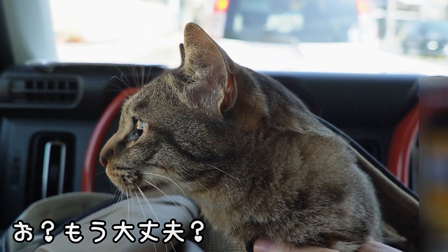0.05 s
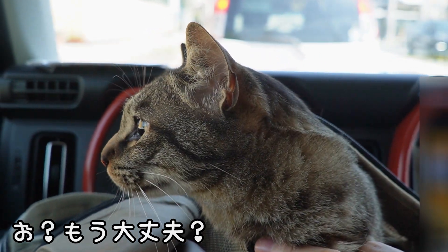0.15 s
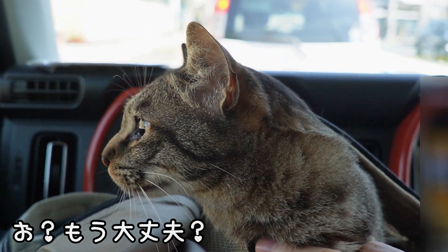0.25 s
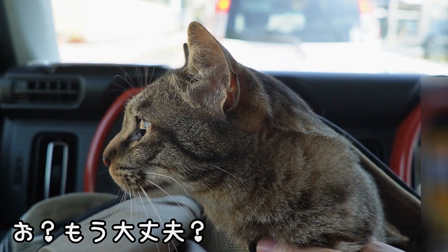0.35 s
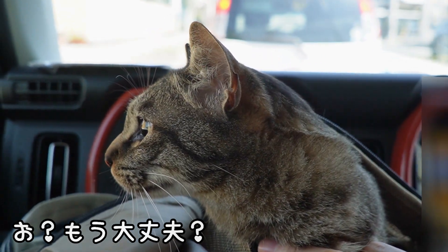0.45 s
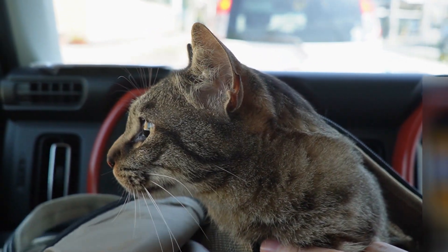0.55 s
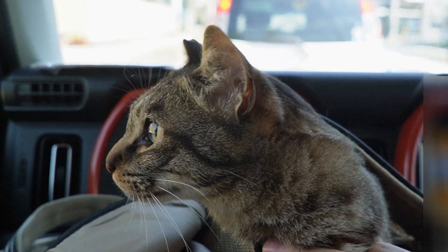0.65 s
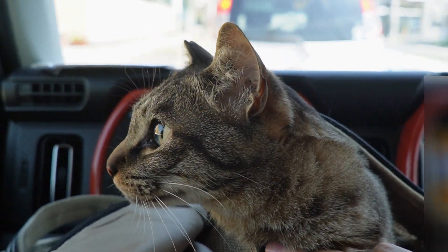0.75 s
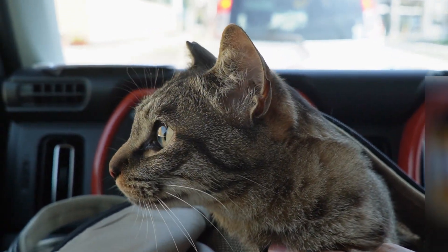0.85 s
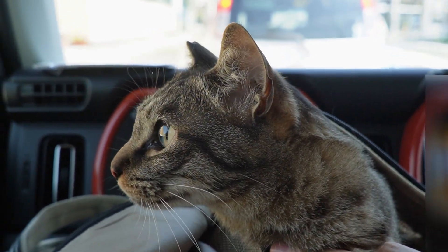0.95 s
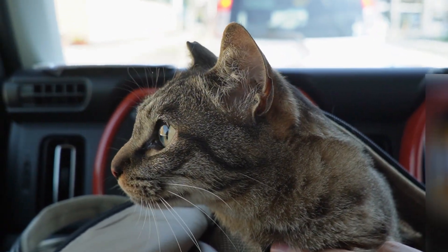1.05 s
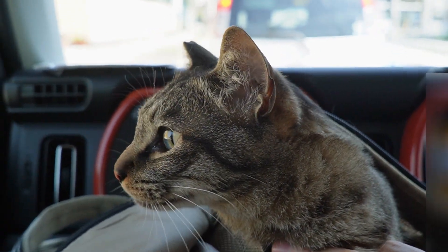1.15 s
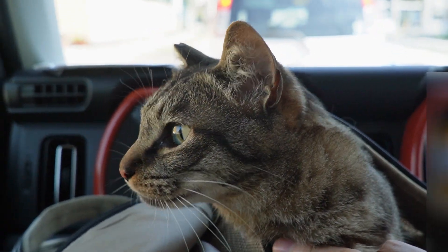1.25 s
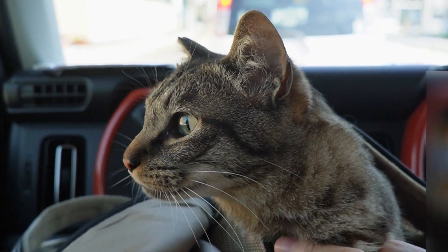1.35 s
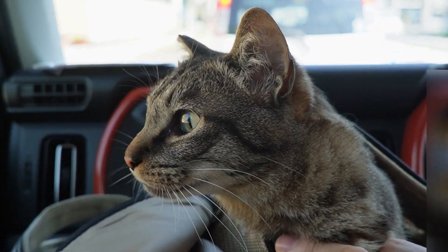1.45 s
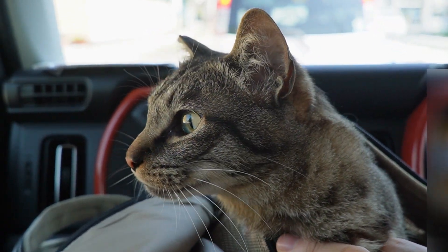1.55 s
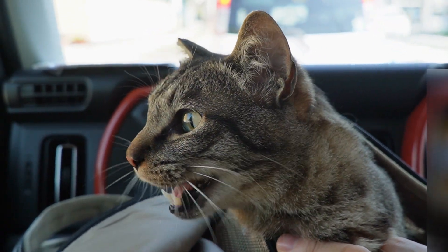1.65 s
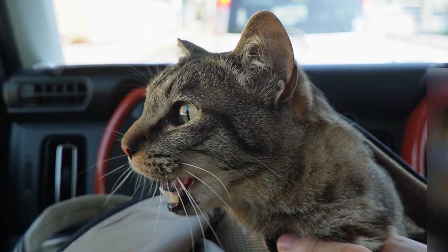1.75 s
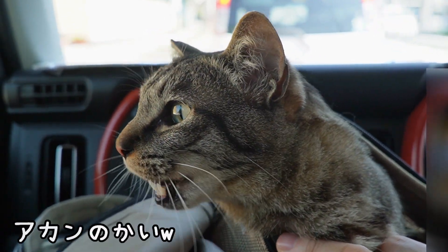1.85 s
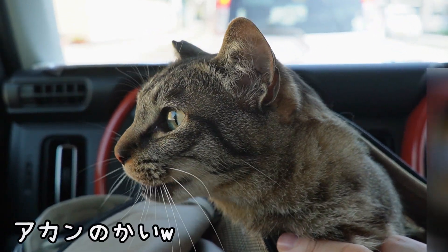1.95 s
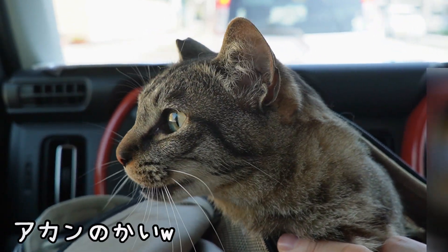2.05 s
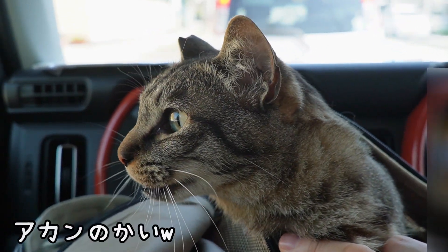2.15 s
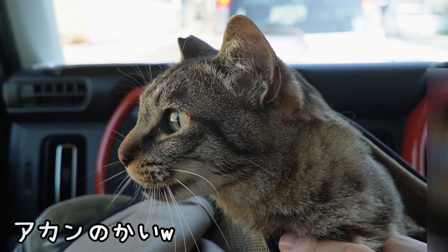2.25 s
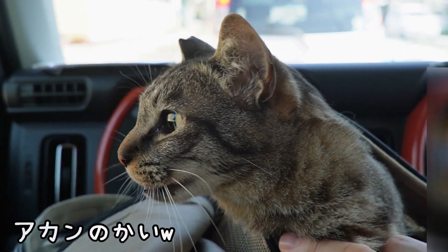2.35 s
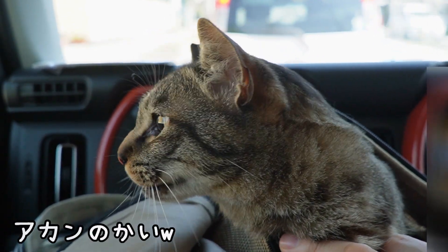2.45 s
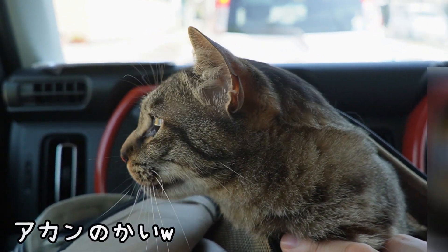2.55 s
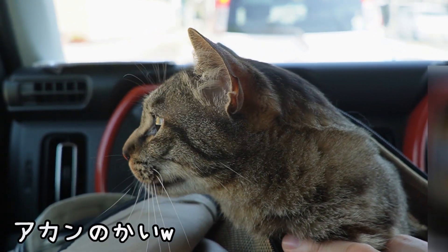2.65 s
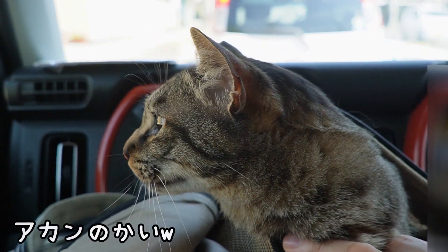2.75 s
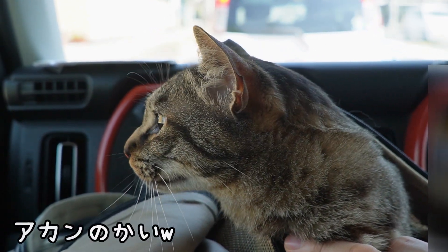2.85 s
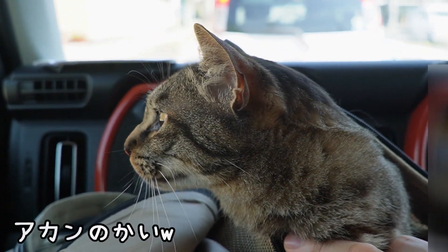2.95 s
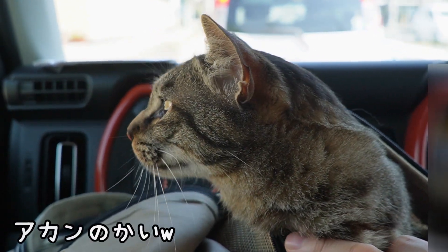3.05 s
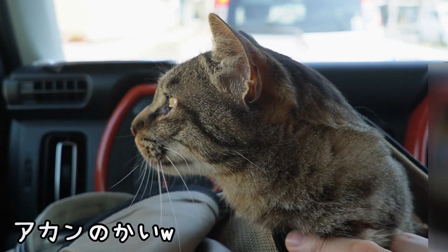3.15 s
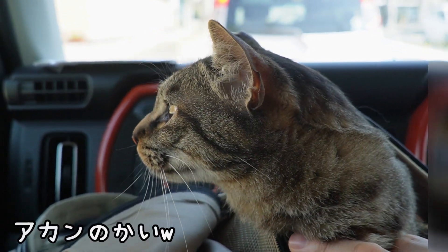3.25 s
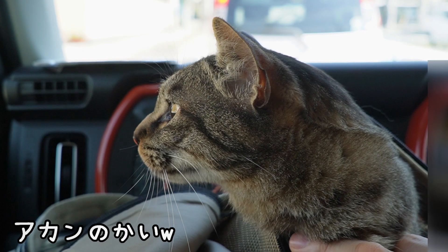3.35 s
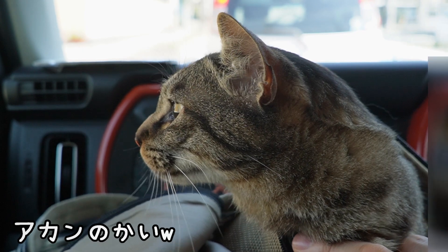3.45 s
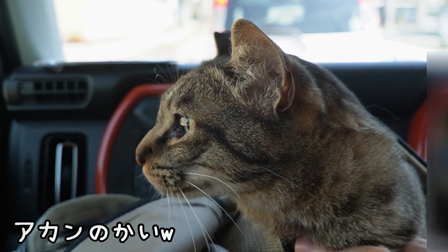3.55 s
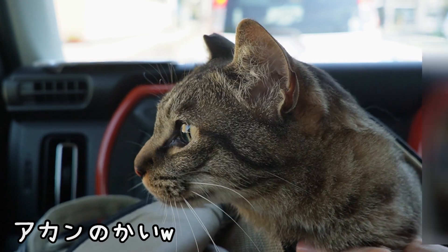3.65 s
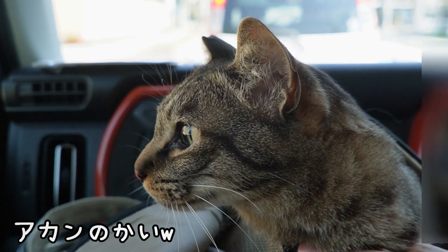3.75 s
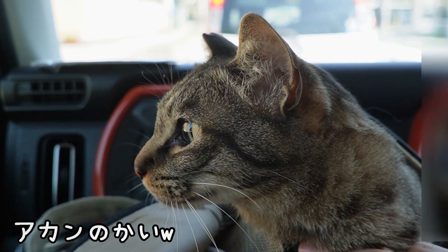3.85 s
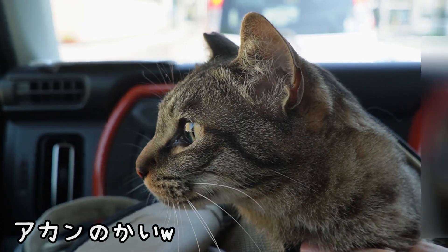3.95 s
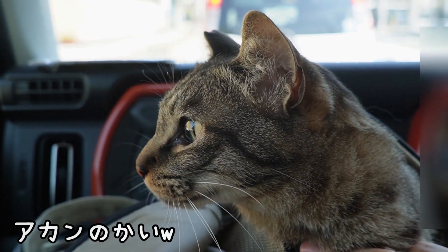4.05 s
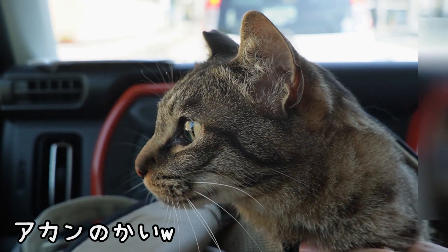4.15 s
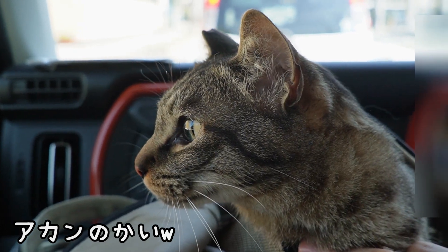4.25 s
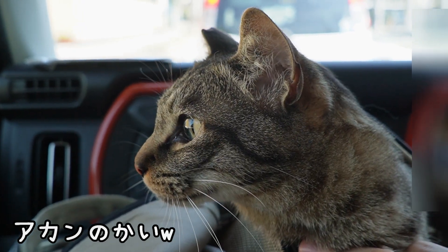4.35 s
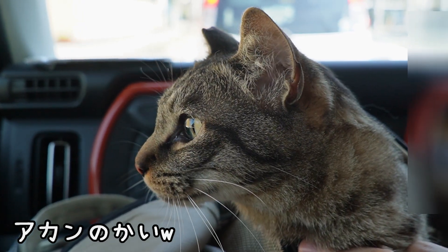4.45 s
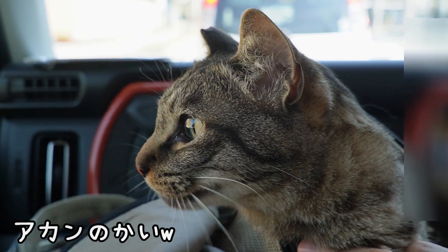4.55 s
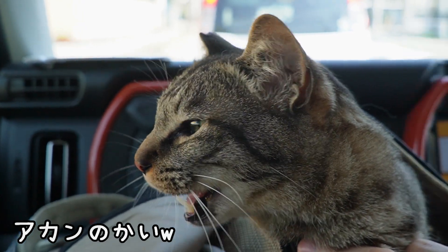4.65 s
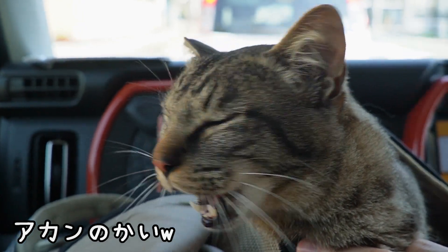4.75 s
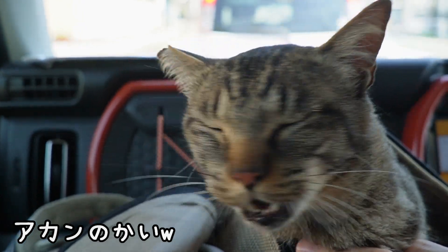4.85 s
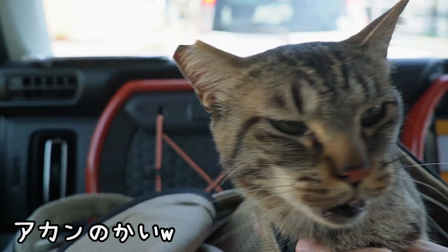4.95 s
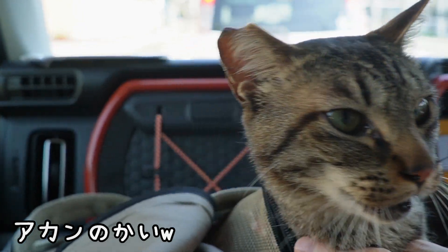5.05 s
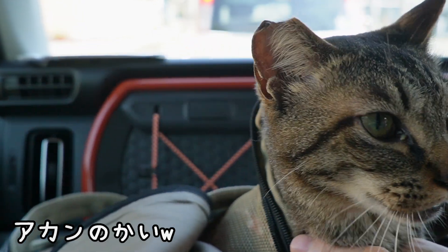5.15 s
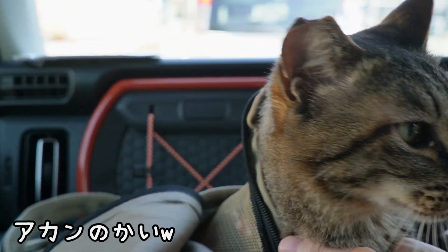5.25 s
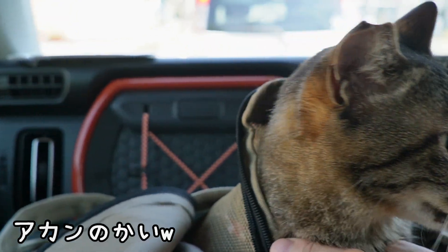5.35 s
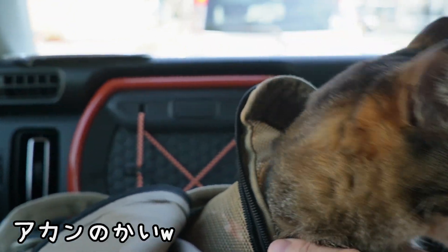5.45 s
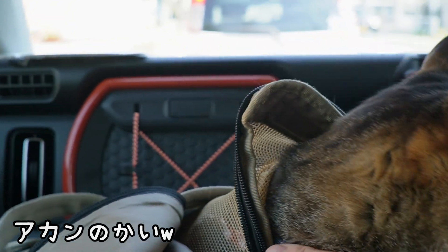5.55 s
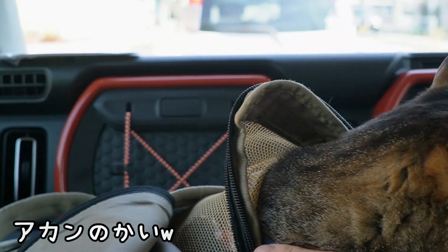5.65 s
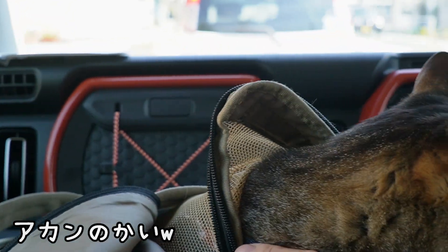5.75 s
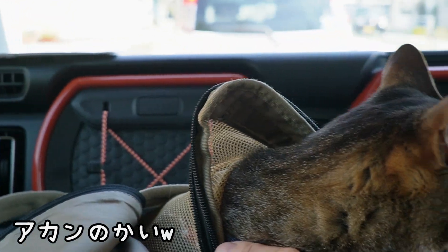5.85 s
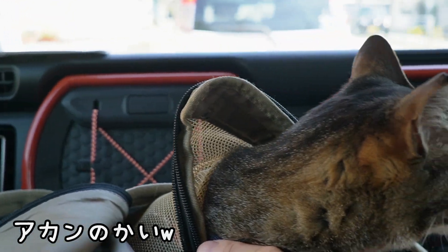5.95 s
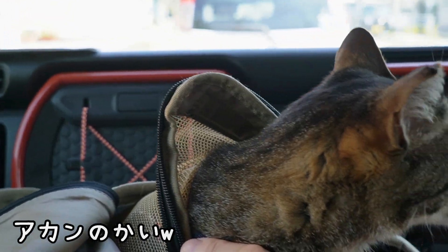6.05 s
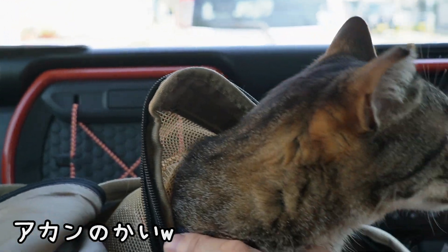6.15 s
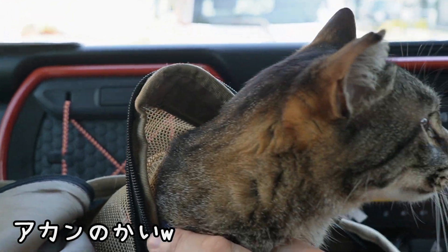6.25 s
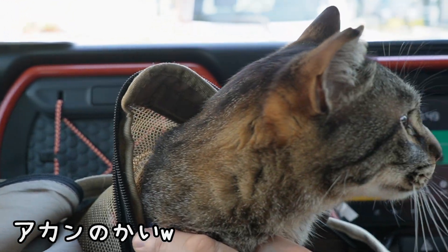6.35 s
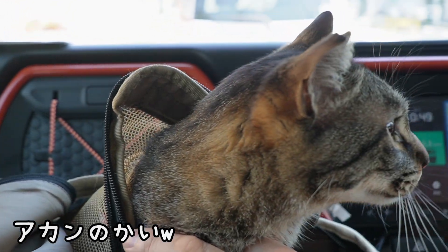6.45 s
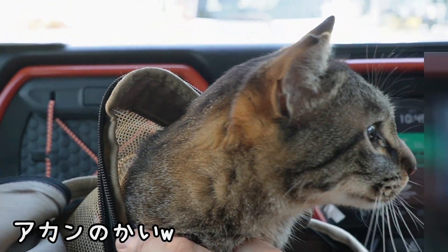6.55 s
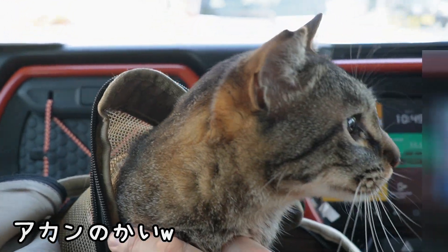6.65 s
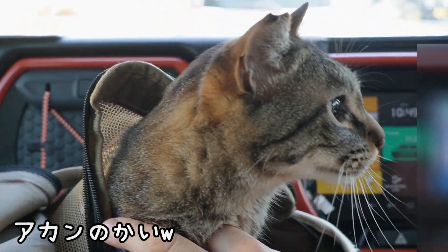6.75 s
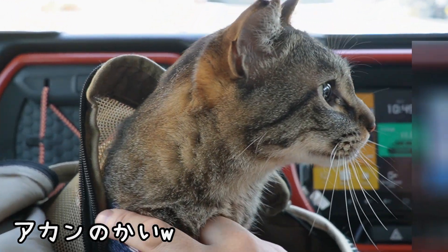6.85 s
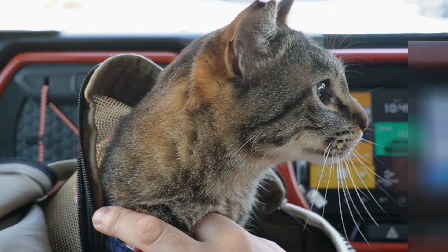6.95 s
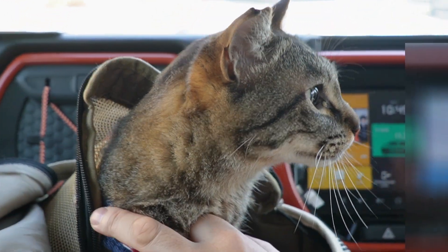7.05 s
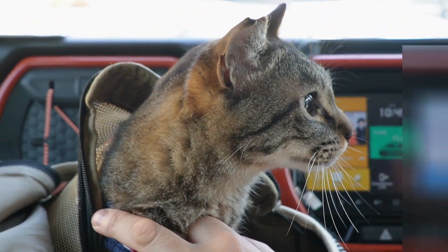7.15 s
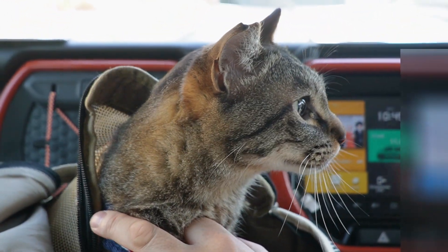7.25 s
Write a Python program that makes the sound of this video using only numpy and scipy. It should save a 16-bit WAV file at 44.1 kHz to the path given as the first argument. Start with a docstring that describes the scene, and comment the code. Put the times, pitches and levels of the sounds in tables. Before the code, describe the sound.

A cat meows loudly twice inside an idling car, then its carrier rustles and clicks over a low engine hum.

```python
"""A cat meows twice from an open carrier inside a car that idles in traffic.
Each meow is a stack of partials shaped by a mouth that opens wide and slowly closes; the voice
rasps, clears, then crumbles. The engine sets the cabin humming over steady rumble and fan noise,
and road wash and faint whines come through the glass. As the cat turns, the carrier's cloth
rustles, the bag creaks, and its frame and zip tick."""
import sys
import numpy as np
from scipy import signal
from scipy.io import wavfile
from scipy.ndimage import uniform_filter1d

SR = 44100
rng = np.random.default_rng(int(sys.argv[2]) if len(sys.argv) > 2 else 0)


def digitize_waveform(pressure):
    """Quantize a signal to 16-bit integers and store it at the path in sys.argv[1].

    Rows of a 2-D input are taken as channels; values are limited to [-1, 1].
    """
    field = np.atleast_2d(pressure).T
    bounded = np.clip(field, -1, 1)
    quanta = np.round(bounded * 32767).astype(np.int16)
    wavfile.write(sys.argv[1], SR, quanta)


N = 322359
TIME = np.arange(N) / SR


def from_db(db):
    """Decibels to gain."""
    return 10 ** (np.asarray(db) / 20)


def in_time(rows, t):
    """Automation: a table's columns, read at the times t."""
    s, *columns = np.transpose(rows)
    return [np.interp(t, s, column) for column in columns]


def at_hz(curve, hz):
    """An EQ curve, read on a log-frequency axis."""
    points_hz, values = np.transpose(curve)
    return np.interp(np.log(hz), np.log(points_hz), values)


def drift(rate_hz, size=N):
    """Random modulator: noise low-passed twice, rms 1."""
    hop, settle = 16, 3000
    pole = np.exp(-2 * np.pi * rate_hz * hop / SR)
    noise = rng.standard_normal(size // hop + settle + 2)
    slow = signal.lfilter([1], [1, -2 * pole, pole * pole], noise)[settle:]
    return np.interp(np.arange(size) / hop, np.arange(len(slow)), slow / np.sqrt(np.mean(slow ** 2)))


def panned(x, pan_db):
    """Mono to stereo; pan is left level over right."""
    return np.array([x * from_db(pan_db / 2), x * from_db(-pan_db / 2)])


# Stereo image of the noise layers: f/Hz, left-right correlation
NOISE_IMAGE = [(60, 0.96), (150, 1), (380, 0.81), (950, 0.85), (2380, 0.77), (5980, 0.32), (15000, 0.085)]


def shaped_noise(eq, gain, shimmer_db=0):
    """Third-octave noise, wider towards the treble; shimmer lets each treble octave swell alone."""
    edges = 20 * 2 ** (np.arange(30) / 3)
    centres = np.sqrt(edges[:-1] * edges[1:])
    weights = from_db(at_hz(eq, centres))
    weights *= np.sqrt(SR / 2 / np.sum(weights ** 2 * np.diff(edges)))   # the EQ sets colour only
    swells = [from_db(shimmer_db * drift(5)) for _ in range(5)]
    white, out = rng.standard_normal((2, 2, N)), 0
    for k, alike in enumerate(at_hz(NOISE_IMAGE, centres)):
        bandpass = signal.butter(2, edges[k:k + 2], "band", fs=SR, output="sos")
        mid, side = signal.sosfilt(bandpass, white[k % 2])
        band = np.sqrt(1 + alike) * mid + np.sqrt(1 - alike) * side * [[1], [-1]]
        out += weights[k] * swells[max(k // 3 - 5, 0)] * band
    return gain * out


# EQ of the cabin's rumble and fan: f/Hz, relative level/dB
CABIN_EQ = [(15, -42), (25, -13), (133, -8), (216, 2), (267, -0.5), (360, -12.5), (553, -8), (633, -8),
            (765, -17), (1720, -9.5), (3190, -14), (3850, -15), (15600, -36)]


def cabin_bed(level_db=-52.5):
    """Steady rumble and fan noise fill the cabin."""
    return shaped_noise(CABIN_EQ, from_db(level_db))


# Beating of the hum, with a dip at each whole count: t/s, beats so far
HUM_BEATS = [(0, -.2), (.62, 3), (1.29, 5), (1.5, 6), (1.77, 7), (2.07, 8), (2.95, 12), (3.21, 13),
             (3.79, 16), (4.17, 16.93), (4.47, 17.07), (4.8, 18), (5.07, 19), (6.05, 22), (6.65, 23),
             (7.31, 24.1)]
# Fainter engine tones: f/Hz, level/dB
ENGINE_TONES = [(113, -69), (176, -64), (248, -64), (272, -61)]


def engine(hum_hz=204, hum_db=-50.3, partner_gain=.85):
    """The idle hums as two close tones that beat, among fainter, unsteady neighbours."""
    phase = 2 * np.pi * np.cumsum(hum_hz + 1.4 * drift(2.1)) / SR
    beat = np.pi * in_time(HUM_BEATS, TIME)[0]
    out = from_db(hum_db) * (np.sin(phase + beat) - partner_gain * np.sin(phase - beat))
    for hz, db in ENGINE_TONES:
        gain = from_db(db + 2.5 * drift(2.9))
        out += gain * np.sin(2 * np.pi * np.cumsum(hz + 3 * drift(4.64)) / SR)
    return np.sqrt(2) * out


# EQs of passing rumble and road wash: f/Hz, relative level/dB
RUMBLE_EQ = [(30, -1.5), (60, -4), (110, 4.5), (160, -4), (300, -39.5)]
WASH_EQ = [(400, -45.5), (540, -14), (640, 2.5), (900, 3.5), (1300, 1), (2200, -14), (5000, -38)]
# Traffic faders: t/s, rumble level/dB, wash level/dB
TRAFFIC_FADERS = [(0, -62, -51.5), (.8, -68, -52.5), (1.2, -58.5, -53.5), (2.8, -63.5, -54),
                  (3.6, -65.5, -58), (4.5, -65, -57.5), (5.3, -76, -53.5), (6.2, -72, -56.5),
                  (7.31, -78, -61)]


def traffic():
    """Passing rumble and road wash come through the glass and thin out."""
    rumble_db, wash_db = in_time(TRAFFIC_FADERS, TIME)
    return shaped_noise(RUMBLE_EQ, from_db(rumble_db)) + shaped_noise(WASH_EQ, from_db(wash_db))


# Vehicle whines: start t/s, start f/Hz, end t/s, end f/Hz, level/dB
WHINE_GLIDES = [(0, 612, 1.55, 555, -63), (.8, 730, 1.35, 715, -67), (3.3, 630, 4.2, 625, -69)]


def whines():
    """Vehicles outside give faint, wavering glides that fade in and out."""
    out = np.zeros(N)
    for start, start_hz, end, end_hz, db in WHINE_GLIDES:
        span = np.arange(int(start * SR), int(end * SR))
        size = len(span)
        hz = np.linspace(start_hz, end_hz, size) + 9 * drift(12, size)
        swell = from_db(db + 4 * drift(11, size)) * signal.windows.tukey(size, .3)
        out[span] += np.sqrt(2) * swell * np.sin(2 * np.pi * np.cumsum(hz) / SR)
    return out


# EQs of cloth rustle and bag creak: f/Hz, relative level/dB
CLOTH_EQ = [(300, -12), (800, -11), (2000, 0), (3000, -2), (4500, -0.5), (7000, -4.5), (9000, -10),
            (12000, -23), (16000, -28)]
CREAK_EQ = [(150, -34), (300, -3), (480, -1.5), (650, -14), (1200, -22.5)]
# The cat's moves: peak t/s, half length/s, rustle level/dB, creak level/dB
CAT_MOVES = [(2.782, .2, -54.5, -63), (3.321, 0.23, -53, -85), (5.26, 0.16, -48, -61),
             (5.557, .09, -48.5, -68), (5.912, 0.27, -51, -79), (6.18, 0.2, -52, -53),
             (6.578, 0.17, -48.5, -55.5), (7.24, 0.075, -48, -54.5)]


def carrier_rustle(cloth_rest_db=-66, creak_rest_db=-61.5):
    """Cloth rustle and bag creak flicker quietly and swell each time the cat shifts."""
    cloth_power, creak_power = from_db(cloth_rest_db) ** 2, from_db(creak_rest_db) ** 2
    for peak, half_length, cloth_db, creak_db in CAT_MOVES:
        swell = np.exp(-((TIME - peak) / half_length) ** 2)
        cloth_power += from_db(cloth_db) ** 2 * swell
        creak_power += from_db(creak_db) ** 2 * swell
    cloth = shaped_noise(CLOTH_EQ, np.sqrt(cloth_power) * from_db(1.2 * drift(25)), shimmer_db=.8)
    creak = shaped_noise(CREAK_EQ, np.sqrt(creak_power) * from_db(3 * drift(8.6)))
    return cloth + creak


# Brief rough spikes and level dips in the meows: t/s, hoarseness/dB re voice, level dip/dB
SPIKES_AND_DIPS = [(1.68, -14, 0), (1.776, -18, -2), (2.664, -20, 0), (4.702, -22, 0), (4.716, -24, -4),
                   (4.756, -38, -5), (5.124, -26, 0)]


def spikes_and_dips(t, half_length_s=.007):
    """The meow turns rough for an instant, dips in level, or both; at 4.756 s it just dips."""
    times, hoarse_db, dip_db = np.transpose(SPIKES_AND_DIPS)
    pulses = np.exp(-((t[:, None] - times) / half_length_s) ** 2)
    return pulses @ from_db(hoarse_db), pulses @ dip_db


def hoarseness(t, rasp_end, crumble_start, floor_db=-36, fade_s=.006):
    """The voice catches, rasps while the mouth opens, clears, and crumbles at the close."""
    catch = from_db(-8) * np.exp(-(t - t[0]) / .012)
    rasp = from_db(-26) * (1 - np.tanh((t - rasp_end) / fade_s)) / 2
    closing_s = t - crumble_start
    crumble = from_db(-23 + 220 * closing_s) * (1 + np.tanh(closing_s / fade_s)) / 2
    return from_db(floor_db) + catch + rasp + crumble


def formant(hz, centre_hz, width_hz):
    """A steep resonance, gain 1 on top."""
    return 1 / (1 + ((hz - centre_hz) / width_hz) ** 2) ** 2


# Mouth automation, one table a meow: t/s, pitch f/Hz, effort/dB, first formant f/Hz, second f/Hz,
# second level/dB re first, middle fader/dB, upper f/Hz, upper fader/dB (both faders ride on effort)
MOUTH_MOVES = [
    [(1.638, 505, -52, 1130, 2580, -21, -24, 5570, -9),
     (1.654, 478.3, -22, 1200, 2500, -21, -24, 5570, -23),
     (1.668, 474.6, -15.5, 1320, 2260, -18, -32, 5700, -6),
     (1.682, 521.5, -19, 1990, 3380, -28, -25, 5100, -4.5),
     (1.72, 521.6, -8.5, 1950, 2870, -25, -22.5, 5600, -20.5),
     (1.735, 494.6, 4.5, 1900, 2700, -27, -32, 5500, -15),
     (1.762, 485, 4, 1780, 2350, -15.5, -21.5, 5250, -25.5),
     (1.776, 511, -1, 1780, 2120, 3, -23, 5750, -17), (1.795, 481, -3, 1520, 2200, -5, -26, 4500, -23),
     (1.84, 465.2, 14, 1480, 2250, -10.5, -26.5, 4300, -36), (1.9, 468, 5, 1475, 2100, -29, -24, 4300, -45),
     (1.93, 479.6, 3, 1420, 2074, -4, -30, 4400, -22), (1.99, 488.3, 0.5, 1261, 1996, -4.5, -26, 4580, -18),
     (2.06, 488.8, -12, 1087, 1854, 2, -17, 6000, -15), (2.16, 496.3, -19, 1063, 1853, 12, -20.5, 5090, -2),
     (2.28, 490.9, -17.5, 1130, 1860, 7.5, -18, 5200, -1.5),
     (2.32, 496.5, -16.5, 1140, 1890, 6.5, -27, 5183, -3),
     (2.45, 491, -12.5, 1158, 1980, -1.5, -24.5, 5870, -8),
     (2.5, 489.2, -10.5, 1140, 1705, -10.5, -20, 5750, -23.5),
     (2.65, 473, -11, 1228, 2020, -8.5, -33, 6120, -21),
     (2.665, 422.5, -13, 1250, 2020, -15, -30, 5554, -13.5),
     (2.678, 417, -20.5, 1200, 1950, 4, -20, 5500, -15),
     (2.692, 405.4, -20.5, 420, 1529, -11.5, -36, 5910, -12.5),
     (2.72, 396, -32, 396, 1870, -6, -17, 6130, -10), (2.76, 401.6, -47, 420, 1850, 8, 6, 6000, 3)],
    [(4.596, 518, -39, 1280, 2140, -10, -30, 4960, -14),
     (4.602, 443, -27.5, 1360, 2200, -13, -30, 4900, -1.5),
     (4.61, 543, -32, 1300, 2400, 17.5, -21, 5070, 2), (4.63, 543, -27.5, 1500, 2700, -2, -19, 5000, 1),
     (4.644, 495, -21, 1920, 3150, -26, -18, 4840, -12.5),
     (4.662, 513.6, -14, 1900, 3080, -26, -19, 5000, -16),
     (4.7, 508.6, -8, 1825, 2910, -24.5, -21, 4880, -23),
     (4.716, 496, -7.5, 1680, 2640, -33, -25, 4700, -16),
     (4.745, 503.7, -11, 1730, 2460, -14.5, -19, 5200, -21),
     (4.8, 484.5, -2.5, 1586, 2220, -4.5, -38, 4800, -34),
     (4.85, 486.7, -5, 1460, 2114, 6, -20, 4900, -16.5),
     (4.92, 493.5, -18, 1142, 2144, 10.5, -3.5, 5140, -3.5),
     (5.01, 493.8, -17, 820, 2163, 3.5, -4, 6120, -9), (5.1, 500, -16.5, 870, 2134, -7, -16, 4900, -11.5),
     (5.22, 491.7, -20.5, 674, 1275, -15.5, -23.5, 5320, -18.5),
     (5.24, 478, -20.5, 560, 1396, -17, -26, 5300, -21), (5.253, 405, -19, 524, 1200, -23, -22, 5350, -33),
     (5.285, 379, -54, 400, 1500, 10, -1, 5500, -19)],
]
# Per meow: rasp end t/s, crumble start t/s, sheen level/dB re upper fader, start pan/dB, end pan/dB
MEOW_SETTINGS = [(1.762, 2.689, -42, 0, 1), (4.688, 5.192, -48, 2, 0)]
# Partials 1 to 6 through the first two formants: gain/dB
LOW_PARTIALS = [-9.5, 1.5, 5.5, -0.5, -2, 13]
# EQ of the voice's reedy top: f/Hz, relative level/dB
REEDY_EQ = [(3000, -16), (5500, -9.5), (7300, -9.5), (8200, -20), (9400, -19.5), (10500, -32.5),
            (12500, -34), (16000, -50.5)]


def meow(mouth, rasp_end, crumble_start, sheen_db, start_pan_db, end_pan_db):
    """Partials on one pitch pass through formants that rise and sink as the mouth opens and closes."""
    span = np.arange(int(mouth[0][0] * SR), int(mouth[-1][0] * SR))
    t, size = span / SR, len(span)
    pitch, effort_db, first_hz, second_hz, second_db, middle_db, upper_hz, upper_db = in_time(mouth, t)
    rough_spikes, dip_db = spikes_and_dips(t)
    hoarse = hoarseness(t, rasp_end, crumble_start) + rough_spikes
    phase = 2 * np.pi * np.cumsum(pitch * (1 + .0015 * drift(40, size))) / SR
    voice = 0
    for k in range(1, 31):
        hz = k * pitch
        if k <= len(LOW_PARTIALS):
            gain = formant(hz, first_hz, 350) + from_db(second_db) * formant(hz, second_hz, 253)
            gain *= from_db(LOW_PARTIALS[k - 1])
            gain += from_db(-14.5) * formant(hz, 1080, 230)   # the throat resonance stays put
        else:
            gain = from_db(middle_db - 10) * formant(hz, 3327, 1500)
            gain += from_db(upper_db - 8.5) * formant(hz, upper_hz, 654)
            gain += from_db(-17 + .41 * upper_db + at_hz(REEDY_EQ, hz))   # partly follows the upper fader
            gain += from_db(upper_db + sheen_db) * formant(hz, 13600, 600)
            gain *= from_db(1.5 * drift(5, size) + 1.5 * drift(30, size))   # each partial wavers
        # hoarseness shakes each partial with fast noise, the high ones more
        shake = np.minimum(hoarse * (k / 3) ** 1.25, 3)
        along, across = shake * [drift(300, size), drift(300, size)]
        angle = k * phase + 2 * np.pi * rng.random()
        angle = angle + .18 * k ** .33 * drift(.8, size) * [[1], [-1]]   # left and right slip out of step
        partial = (1 + along) * np.sin(angle) + across * np.cos(angle)
        voice += gain * partial / np.sqrt(1 + 2 * shake ** 2)
    envelope = np.sqrt(2) * from_db(effort_db + dip_db)
    out = np.zeros((2, N))
    out[:, span] = voice * panned(envelope, np.linspace(start_pan_db, end_pan_db, size))
    return out


def ring(clicks, hz, t60):
    """A unit click sets a decaying sine of height 1 ringing."""
    radius, step = from_db(-60 / (t60 * SR)), 2 * np.pi * hz / SR
    return signal.lfilter([0, np.sin(step)], [1, -2 * radius * np.cos(step), radius ** 2], clicks)


# Modes of the carrier's frame: f/Hz, relative level/dB, t60/s
FRAME_MODES = [(460, -17, .025), (880, -14, .01), (1600, -6, .008), (2500, -2, .009), (3400, -1, .005),
               (5500, -5, .003)]
# Frame and zip ticks: t/s, body peak level/dB, knock f/Hz, snap f/Hz, crack level/dB re body, pan/dB
TICK_CUES = [(3.11, -30.5, 1109, 3070, 8.5, 0.0), (4.586, -27, 2100, 4400, -11, 1.0),
             (5.397, -29.5, 1130, 2120, -19, -7), (5.571, -15, 1070, 3200, -13, -5.5),
             (5.702, -30, 869, 2120, -17, 0.5), (5.861, -18.5, 1570, 2630, -24, -9),
             (6.004, -26.5, 503, 2440, -15, -1), (6.152, -45, 305.4, 2300, -11, 5),
             (6.204, -24, 1480, 1970, -29, -3), (6.29, -34, 484, 4200, -13, -14),
             (6.389, -33, 505, 4050, -10, -17), (6.465, -29.5, 1590, 2180, -21, 5),
             (7.198, -13.5, 1200, 2476, -24, 6)]


def carrier_ticks(knock_cycles=10, snap_cycles=12, snap_db=4, frame_db=-5):
    """A click with weaker followers sounds a knock, a snap, the frame's modes and a bright crack."""
    out, size = np.zeros((2, N)), SR // 10
    low_cut = signal.butter(2, 420, "high", fs=SR, output="sos")
    for s, db, knock_hz, snap_hz, crack_db, pan_db in TICK_CUES:
        burst = .3 * rng.standard_normal(size) * np.exp(-np.arange(size) / (.0015 * SR))
        burst[0] = 2   # the leading click
        knock = ring(burst, knock_hz, knock_cycles / knock_hz)
        snap = ring(burst, snap_hz, snap_cycles / snap_hz)
        frame = sum(from_db(mode_db + rng.normal(0, 3)) * ring(burst, hz, t60)
                    for hz, mode_db, t60 in FRAME_MODES)
        body = signal.sosfilt(low_cut, knock + from_db(snap_db) * snap + from_db(frame_db) * frame)
        crack = np.diff(burst, prepend=0)
        hit = body / np.abs(body).max() + from_db(crack_db) * crack / np.abs(crack).max()
        start = round(s * SR)
        out[:, start:start + size] += panned(from_db(db) * hit, pan_db)[:, :N - start]
    return out


def cabin_echo(x, t60_s=.12, level_db=-14, predelay_s=.003):
    """The small padded cabin answers with a short tail, different at each side."""
    t = np.arange(SR // 4) / SR
    tail = rng.standard_normal((2, len(t))) * from_db(-60 * t / t60_s) * (t > predelay_s)
    tail /= np.sqrt(np.sum(tail ** 2, 1, keepdims=True))
    return from_db(level_db) * signal.fftconvolve(x, tail, axes=1)[:, :N]


def scene():
    """Cat and carrier up front, the car and the traffic around them."""
    meows = sum(meow(mouth, *settings) for mouth, settings in zip(MOUTH_MOVES, MEOW_SETTINGS))
    near = meows + carrier_ticks()
    return near + cabin_echo(near) + cabin_bed() + engine() + traffic() + whines() + carrier_rustle()


def record(dry, limit_db=-.3, release_db_per_s=220):
    """A limiter holds the loudest peaks and lets go steadily; the bass and the top are cut."""
    level_db = 20 * np.log10(np.abs(dry).max(0) + 1e-9)
    release_db = release_db_per_s * TIME
    held_db = np.maximum.accumulate(level_db + release_db) - release_db
    reduction_db = uniform_filter1d(np.maximum(held_db - limit_db, 0), size=201)
    low_cut = signal.butter(2, 30, "high", fs=SR, output="sos")
    high_cut = signal.ellip(12, .5, 80, 15770, fs=SR, output="sos")
    limited = dry * from_db(-reduction_db)
    return np.clip(signal.sosfilt(high_cut, signal.sosfilt(low_cut, limited)), -1, 1)


dry = scene()
out = record(dry)
digitize_waveform(out)
```